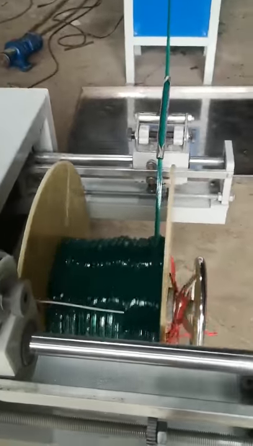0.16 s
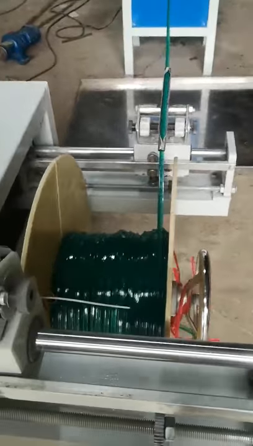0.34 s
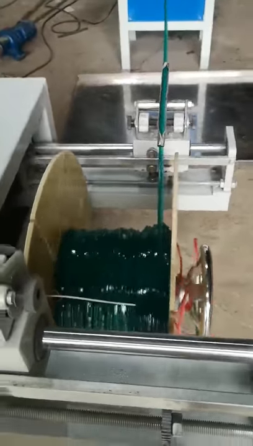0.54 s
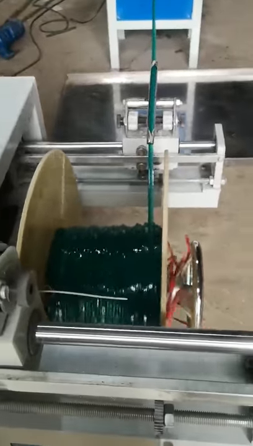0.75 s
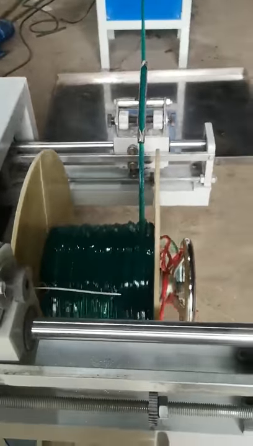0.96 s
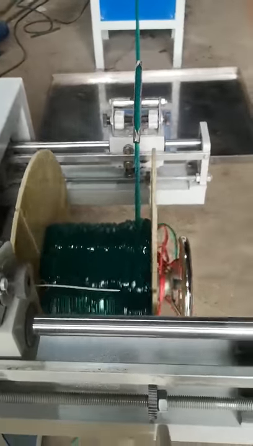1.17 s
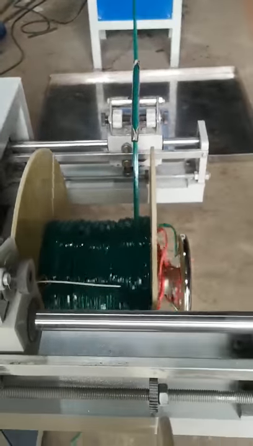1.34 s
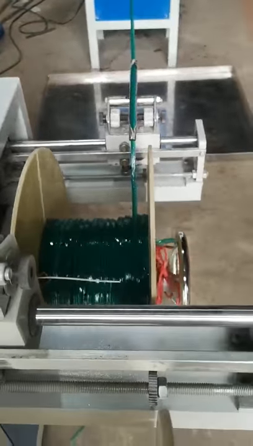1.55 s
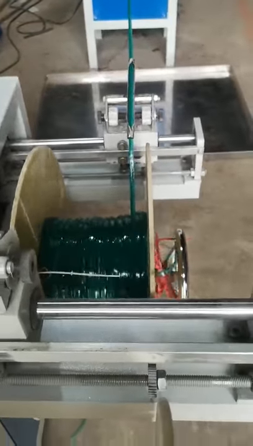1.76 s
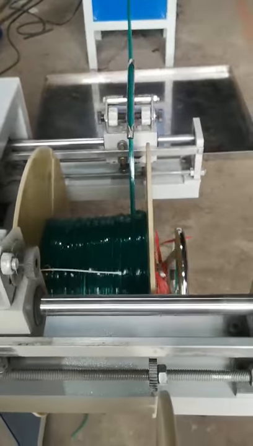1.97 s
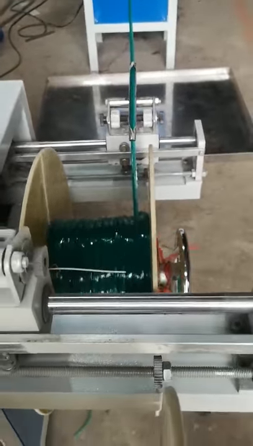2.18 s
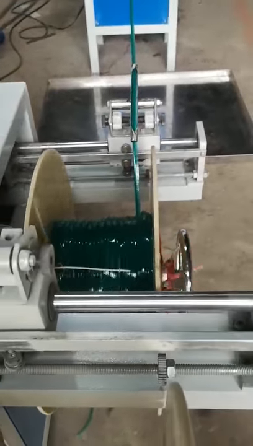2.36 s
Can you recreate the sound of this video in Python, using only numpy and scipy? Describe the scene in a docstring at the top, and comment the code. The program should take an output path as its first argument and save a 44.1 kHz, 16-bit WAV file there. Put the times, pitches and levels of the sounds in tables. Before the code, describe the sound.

Heard from close above, a workshop winding machine hums and rumbles under a thin, high motor whine and rushing fans. Plastic strip rubs through a guide with a swelling hiss and finally gives one sharp snap on the reel.

```python
"""Workshop, close above a winding machine pulling plastic strip onto a reel.
Background: fan air and rumble of other machines, mains hum, throbbing motor and gear notes.
A speed drive whines near 4 kHz, fuzzy because its switching rate jumps at random.
The strip hisses through its guide, swells where it drags, and snaps once against the reel."""
import sys
import numpy as np
from scipy import signal
from scipy.fft import rfft, irfft
from scipy.io import wavfile

SR = 44100
rng = np.random.default_rng(int(sys.argv[2]) if len(sys.argv) > 2 else 0)


def materialize(psi):
    """Save the field psi as 16-bit PCM at rate SR to the path in sys.argv[1].

    A 1-D psi becomes a single channel; in a 2-D psi each row is a channel.
    """
    bounded = np.clip(np.atleast_2d(psi).T, -1, 1)
    quanta = np.round(bounded * 32767).astype(np.int16)
    wavfile.write(sys.argv[1], SR, quanta)


N = 111132
TIME_S = np.arange(N) / SR
FREQ_HZ = np.fft.rfftfreq(N, 1 / SR)

# left-right likeness of the noise: freq_hz, correlation
EAR_CORRELATION = [(30, 0.98), (130, 0.91), (280, 0.79), (500, 0), (1500, 0.24), (4000, -.1), (12000, 0)]
# fan air: freq_hz, relative_density_db
AIR_SPECTRUM = [(100, -33), (420, 2.5), (750, -3), (1150, -4), (1800, -1), (2400, -3.5), (3200, -4),
                (4500, -5), (5500, -10), (7200, -45), (9200, -29), (12200, -23.5), (13400, -39),
                (15400, -31)]
# frame and floor rumble: freq_hz, relative_density_db
RUMBLE_SPECTRUM = [(8, -14), (26, -7), (38, -14.5), (60, 2.5), (82, -5.5), (105, -10), (130, -14),
                   (165, -11.5), (195, -13.5), (230, -17.5), (260, -15.5), (335, -23.5), (420, -34.5),
                   (800, -65)]
# mains fundamental: time_s, level_db
MAINS_ENVELOPE = [(0.0, -35), (0.04, -29.5), (0.15, -26.5), (0.2, -38.5), (0.25, -29), (0.43, -34.5),
                  (0.51, -30.5), (0.68, -36.5), (0.74, -28), (0.86, -34), (0.99, -29.5), (1.05, -34),
                  (1.09, -31), (1.99, -28), (2.43, -30), (2.52, -37)]
# mains harmonics and machine tones: pitch_hz, level_db
HUM_TONES = [(100, -55), (300.15, -45.5), (496.7, -68), (600.3, -65.5), (800.3, -69), (856.6, -78),
             (900.3, -72.5), (1229, -74.5), (1997.6, -70), (2151, -67.5), (2304.8, -70.5), (2487.2, -73.5)]
# motor and gear drone, close pairs beat: pitch_hz, level_db
DRONE_TONES = [(25, -49), (26.9, -44), (31, -48), (64, -50.5), (245, -58.5), (260, -60)]
# motor note: time_s, gain_db
MOTOR_ENVELOPE = [(0.0, -43.5), (0.14, -38.5), (0.34, -55), (0.47, -36.5), (0.53, -49), (0.58, -32),
                  (0.65, -42.5), (0.74, -34), (0.83, -52), (0.88, -44.5), (0.98, -50), (1.08, -37),
                  (1.43, -42.5), (1.45, -49), (1.59, -42.5), (1.6, -62), (1.69, -39.5), (2.01, -44),
                  (2.06, -65), (2.1, -46), (2.14, -55), (2.17, -47), (2.36, -40), (2.52, -39.5)]
# gear note: time_s, gain_db
GEAR_ENVELOPE = [(0.0, -46.5), (0.11, -44.5), (0.14, -58), (0.39, -45), (0.53, -43.5), (0.6, -59),
                 (0.67, -45.5), (0.88, -43.5), (1.03, -62), (1.18, -42.5), (1.29, -43), (1.35, -80),
                 (1.47, -40), (1.51, -68), (1.54, -42.5), (1.67, -44.5), (1.76, -48), (1.85, -51),
                 (1.92, -69), (1.96, -46), (2.13, -47), (2.17, -72), (2.25, -47.5), (2.52, -41)]
# drive whine: time_s, gain_db, pan_db (positive = left)
WHINE_ENVELOPE = [(.08, -50.5, -4), (.18, -48.5, 4), (.25, -46.5, 0.5), (.36, -43.5, -2.5),
                  (.56, -43, -4.5), (.68, -45, -8.5), (.77, -43, -4.5), (.9, -45, 4), (.99, -45.5, 1),
                  (1.03, -43, 3), (1.12, -46, 0.5), (1.38, -49, 0), (1.54, -46.5, -5.5), (1.7, -47.5, 0.5),
                  (2.0, -47.5, -1.5), (2.36, -47.5, -0.5), (2.52, -48.5, -3)]
# whine partials: carrier_ratio, relative_db, pan_db, wander_factor
WHINE_PARTIALS = [(1, 1.26, 1, 1), (1.978, -13, 11, 1.4), (2.97, -35, 15, 5)]
# motor housing resonances: centre_hz, sigma_hz, relative_db
HOUSING_BANDS = [(3690, 74, -15.5), (4073, 38, -6.5), (4405, 23, -14)]
# strip rubbing in its guide: freq_hz, relative_density_db
RUB_SPECTRUM = [(500, -0.5), (1200, -9), (1950, 1), (2600, -1.5), (3200, -2.5), (3800, 6), (4600, 6),
                (5400, -0.5), (7000, -3.5), (8300, -0.5), (9600, -24.5), (13000, -68)]
# rubbing strength: time_s, level_db
RUB_ENVELOPE = [(0, -48), (.2, -50.5), (.5, -48.5), (.75, -50), (1.0, -49), (1.25, -49), (1.52, -49),
                (1.7, -51.5), (2.0, -52.5), (2.25, -53), (2.52, -50.5)]
# guide ringing or squealing under drag: peak_s, sigma_s, level_db, centre_hz, sigma_hz
DRAG_SWELLS = [(0.143, 0.18, -60, 2760, 240), (0.56, 0.36, -55, 3530, 720), (0.583, 0.2, -59, 3364, 11.5),
               (0.97, 0.18, -49, 4360, 550), (1.106, 0.51, -54, 1880, 260), (1.516, 0.02, -49.5, 1950, 400),
               (1.527, 0.021, -54.5, 6950, 1950)]
# cracks within the snap: start_s, force_db, decay_s
SNAP_CRACKS = [(2.4630, -28.5, 0.0019), (2.4641, -23, 0.0013), (2.47, -35.5, 0.0025),
               (2.4720, -30.5, 0.00087)]
# crack timbre: freq_hz, relative_density_db
SNAP_SPECTRUM = [(300, 5), (700, -4), (1100, 1), (1650, -2.5), (2650, 4.5), (3400, -15), (4600, -7),
                 (5300, 1.5), (5850, -2.5), (6400, 2.5), (7200, -6), (8200, -1), (10500, -6), (12500, -15),
                 (15000, -25)]
# reel flange modes: pitch_hz, level_db, t60_s
FLANGE_MODES = [(1130, -41, 0.043), (1130, -32.5, 0.014), (2060, -41, 0.041), (2750, -23.5, 0.013),
                (5280, -20.5, 0.012), (5400, -37, 0.076), (6426, -19.5, 0.0076), (8000, -16, 0.003),
                (9800, -23, 0.0034)]

AIR_DB, RUMBLE_DB = -50.5, -39
MAINS_HZ, MOTOR_HZ, GEAR_HZ = 50, 128.26, 194.1
CARRIER_HZ, WANDER_RMS_HZ, WANDER_RATE_HZ = 4004, 62, 417
FLUTTER_DEPTH, FLUTTER_RATE_HZ, WHINE_PHASE_RAD = 0.57, 180, 1.94
RUB_PAN_DB, DRAG_PAN_DB, GRAIN_DB = 10, 14, 1.5
SNAP_RISE_S, SNAP_PAN_DB, SNAP_WET_DB, FLANGE_LAG_RAD = 0.00026, 7, -14.5, 1.03


def amp(db):
    """Decibels to gain."""
    return 10 ** (np.asarray(db) / 20)


def unit_rms(x):
    """Scale to rms 1."""
    return x / np.sqrt(np.mean(abs(x) ** 2) + 1e-20)


def spectrum(points):
    """Table interpolated over log frequency."""
    hz, value = np.transpose(points)
    return np.interp(np.log(FREQ_HZ + 1), np.log(hz + 1), value)


def curve(rows, column=1):
    """Table column interpolated over time."""
    rows = np.array(rows)
    return np.interp(TIME_S, rows[:, 0], rows[:, column])


def pan(db):
    """Constant-power gains; db is left minus right."""
    return unit_rms(np.array([amp(db / 2), amp(-db / 2)]).reshape(2, -1))


def drift(rate_hz):
    """Smooth random signal, rms 1, rolling off at rate_hz."""
    lowpass = np.exp(-(FREQ_HZ / rate_hz) ** 2) * (FREQ_HZ > 0)
    return unit_rms(irfft(rfft(rng.standard_normal(N)) * lowpass, N))


def complex_drift(rate_hz):
    """Random modulator of amplitude and phase."""
    return drift(rate_hz) + 1j * drift(rate_hz)


def colour(x, points):
    """Minimum-phase filter of given spectrum, unit power gain."""
    log_gain = np.log(unit_rms(amp(spectrum(points))))
    cepstrum = irfft(log_gain, N)
    cepstrum[1:N // 2] *= 2
    cepstrum[N // 2 + 1:] = 0
    impulse = irfft(np.exp(rfft(cepstrum)), N)[None, :2048]
    return signal.fftconvolve(x, impulse, axes=1)[:, :N]


def noise(points):
    """Shaped stereo noise, rms 1: coherent bass, diffuse treble."""
    mid, side = rfft(rng.standard_normal((2, N)))
    correlation = spectrum(EAR_CORRELATION)
    mid *= np.sqrt((1 + correlation) / 2)
    side *= np.sqrt((1 - correlation) / 2)
    return unit_rms(irfft(np.array([mid + side, mid - side]) * amp(spectrum(points)), N))


def band(centre_hz, sigma_hz):
    """Noise in one resonance, independent per ear."""
    bell = np.exp(-((FREQ_HZ - centre_hz) / sigma_hz) ** 2 / 2)
    return unit_rms(irfft(rfft(rng.standard_normal((2, N))) * bell, N))


def tones(rows, rate_hz, waver=0.068):
    """Wavering tones; higher ones reach the ears out of step."""
    out = np.zeros((2, N))
    for hz, db in rows:
        mid = 1 + waver * complex_drift(rate_hz)
        spread = min(hz / 900, 1) ** 1.49
        side = spread * unit_rms(drift(rate_hz=0.78) + 1j * drift(rate_hz=0.64))
        carrier = np.exp(2j * np.pi * (hz * TIME_S + rng.random()))
        out += np.sqrt(2) * amp(db) * (np.array([mid + side, mid - side]) * carrier).real
    return out


def reverb(x, t60_s=0.44, gap_s=0.003):
    """Dense decaying workshop reflections, independent per ear."""
    tail = rng.standard_normal((2, N)) * amp(-60 * TIME_S / t60_s) * (TIME_S > gap_s)
    tail /= np.linalg.norm(tail, axis=1, keepdims=True)
    return signal.fftconvolve(x, tail, axes=1)[:, :N]


def fan_air():
    """Steady broadband rush of fans."""
    return amp(AIR_DB) * noise(AIR_SPECTRUM)


def rumble():
    """Low vibration of frame and floor."""
    return amp(RUMBLE_DB) * noise(RUMBLE_SPECTRUM)


def motors():
    """Mains hum and drive-train drone; motor and gear notes throb separately."""
    mains_phase = 2 * np.pi * (MAINS_HZ * TIME_S + rng.random())
    mains = np.sqrt(2) * amp(curve(MAINS_ENVELOPE)) * np.sin(mains_phase)
    motor = amp(curve(MOTOR_ENVELOPE)) * tones([(MOTOR_HZ, -1)], rate_hz=1.9)
    gear = amp(curve(GEAR_ENVELOPE)) * tones([(GEAR_HZ, -1)], rate_hz=7.4)
    hum = tones(HUM_TONES, rate_hz=28.0)
    drone = tones(DRONE_TONES, rate_hz=6.5, waver=0.34)
    return mains + motor + gear + hum + drone


def drive_whine():
    """Random switching rate: a fuzzy whistle fluttering per ear, plus housing resonances."""
    wander_cycles = np.cumsum(WANDER_RMS_HZ * drift(WANDER_RATE_HZ)) / SR
    out = np.zeros((2, N))
    for ratio, db, pan_db, wander_factor in WHINE_PARTIALS:
        cycles = ratio * CARRIER_HZ * TIME_S + wander_factor * wander_cycles
        flutter = np.array([np.exp(1j * ear_rad) + FLUTTER_DEPTH * complex_drift(FLUTTER_RATE_HZ)
                            for ear_rad in (0, WHINE_PHASE_RAD)])
        partial = unit_rms((flutter * np.exp(2j * np.pi * cycles)).real)
        out += amp(db) * pan(pan_db) * partial
    out += sum(amp(db) * band(hz, sigma_hz) for hz, sigma_hz, db in HOUSING_BANDS)
    return out * amp(curve(WHINE_ENVELOPE)) * pan(curve(WHINE_ENVELOPE, column=2))


def strip_hiss():
    """Strip sliding through the guide: grainy hiss, swelling where it drags."""
    hiss = noise(RUB_SPECTRUM) * amp(curve(RUB_ENVELOPE)) * pan(RUB_PAN_DB)
    for peak_s, sigma_s, db, centre_hz, sigma_hz in DRAG_SWELLS:
        swell = amp(db) * np.exp(-((TIME_S - peak_s) / sigma_s) ** 2 / 2)
        hiss += band(centre_hz, sigma_hz) * swell * pan(DRAG_PAN_DB)
    grain = unit_rms(amp(GRAIN_DB * drift(rate_hz=170)))
    return hiss * grain


def strip_snap():
    """Strip slips over the turns below: a cluster of cracks, the hardest ringing the flange."""
    force = np.zeros(N)
    for start_s, db, decay_s in SNAP_CRACKS:
        age_s = np.maximum(TIME_S - start_s, 0)
        rise = np.minimum(age_s / SNAP_RISE_S, 1)
        decay = np.exp(-np.maximum(age_s - SNAP_RISE_S, 0) / decay_s)
        force += amp(db) * rise * decay
    cracks = colour(force * rng.choice([-1., 1.], (2, N)), SNAP_SPECTRUM)
    ring_age_s = np.maximum(TIME_S - TIME_S[np.argmax(force)], 0)
    lag_rad = np.array([[0], [FLANGE_LAG_RAD]])
    ring = sum(amp(db - 60 * ring_age_s / t60_s) * np.sin(2 * np.pi * hz * ring_age_s - lag_rad)
               for hz, db, t60_s in FLANGE_MODES)
    ring *= np.minimum(2 * ring_age_s / SNAP_RISE_S, 1)
    direct = (cracks + ring) * pan(SNAP_PAN_DB)
    return direct + amp(SNAP_WET_DB) * reverb(direct)


def scene():
    """Stereo sum of all sources."""
    return motors() + rumble() + drive_whine() + strip_hiss() + strip_snap() + fan_air()


def record(dry):
    """Low-pass at 15.3 kHz."""
    lowpass = signal.firwin(511, 15300, window=("kaiser", 9), fs=SR)
    return signal.oaconvolve(dry, lowpass[None], "same")


dry = scene()
out = record(dry)
materialize(out)
```